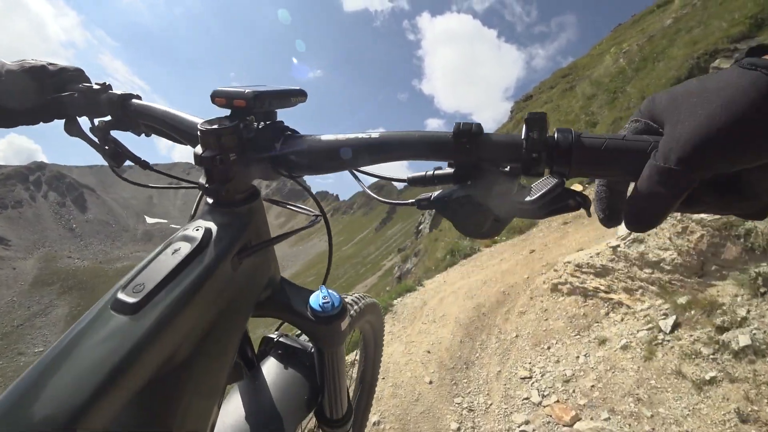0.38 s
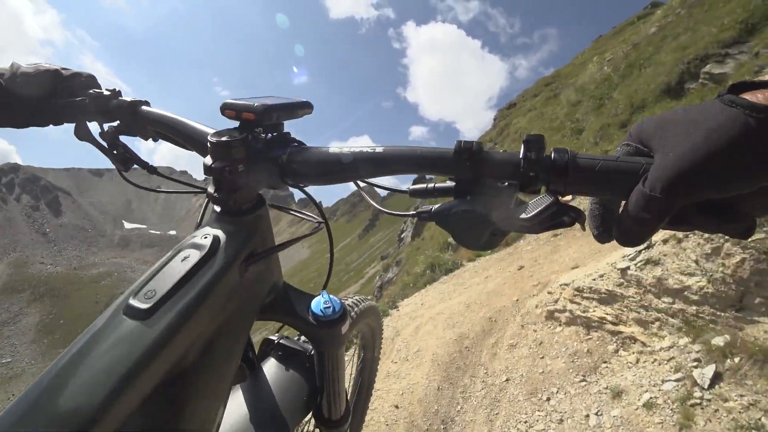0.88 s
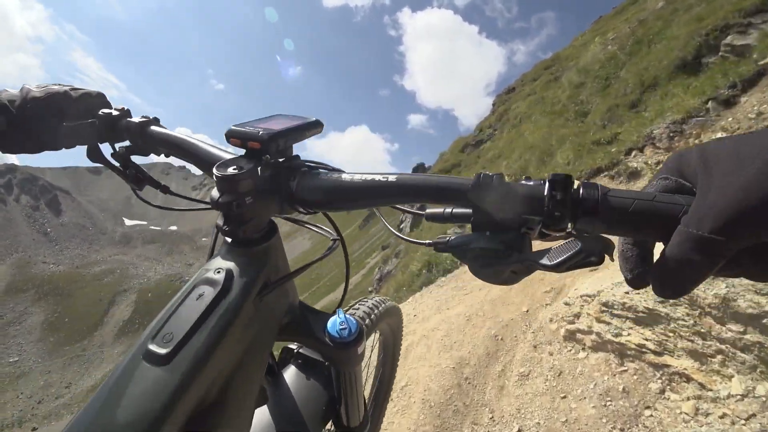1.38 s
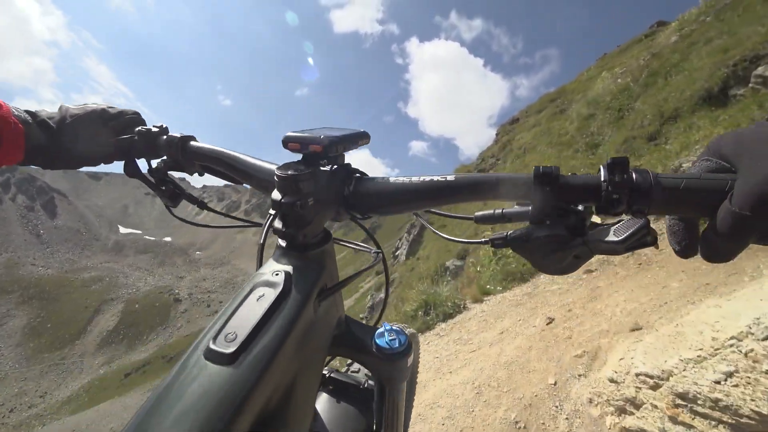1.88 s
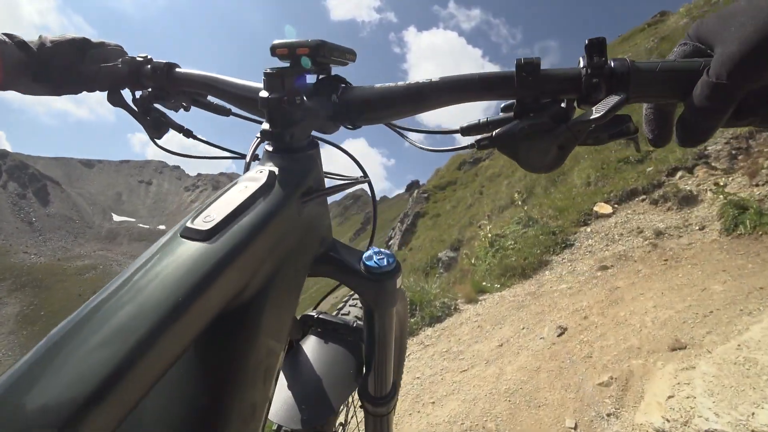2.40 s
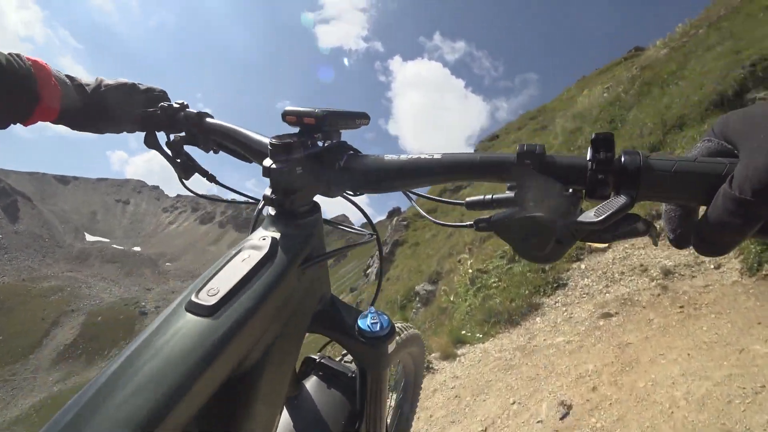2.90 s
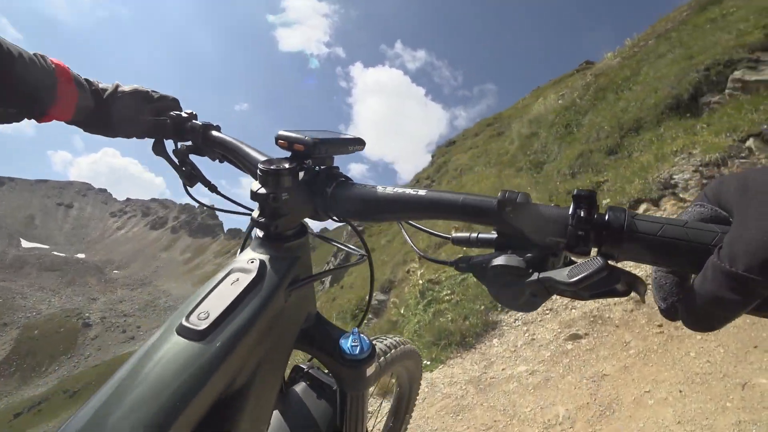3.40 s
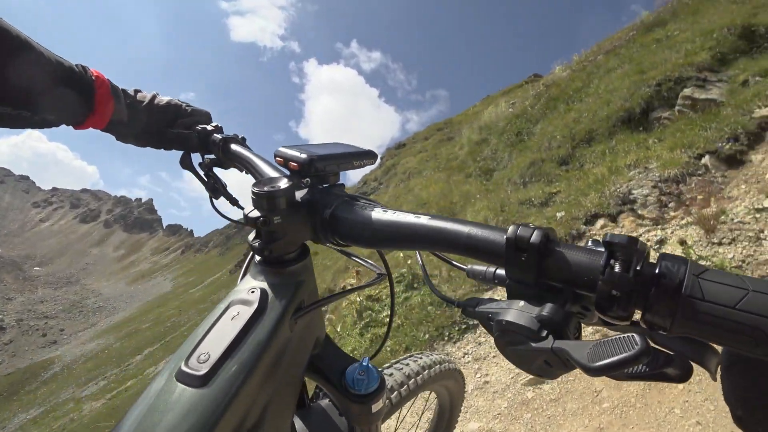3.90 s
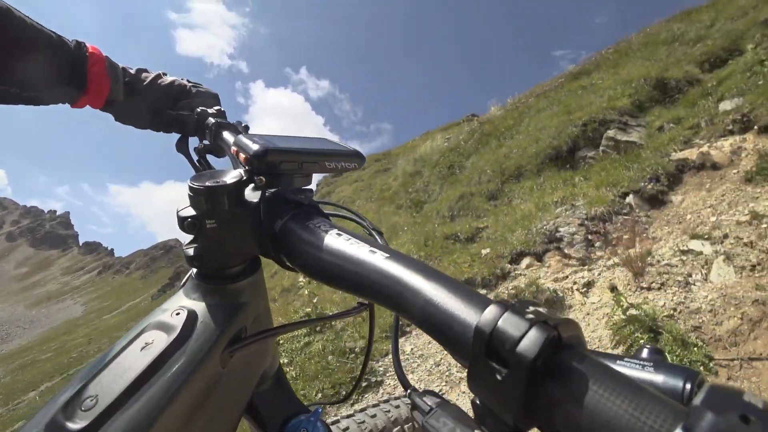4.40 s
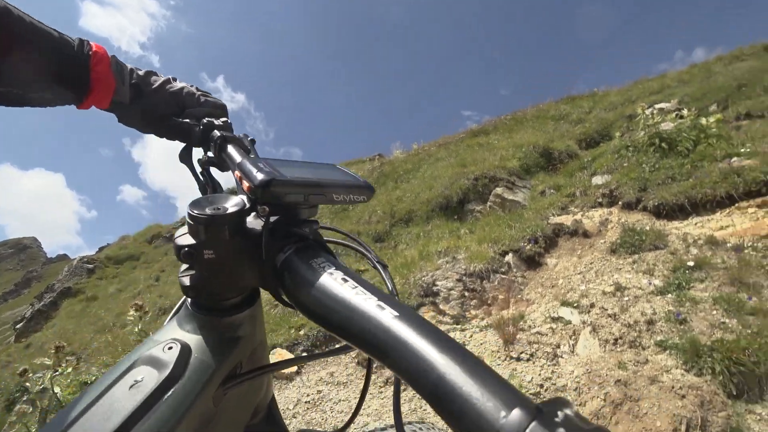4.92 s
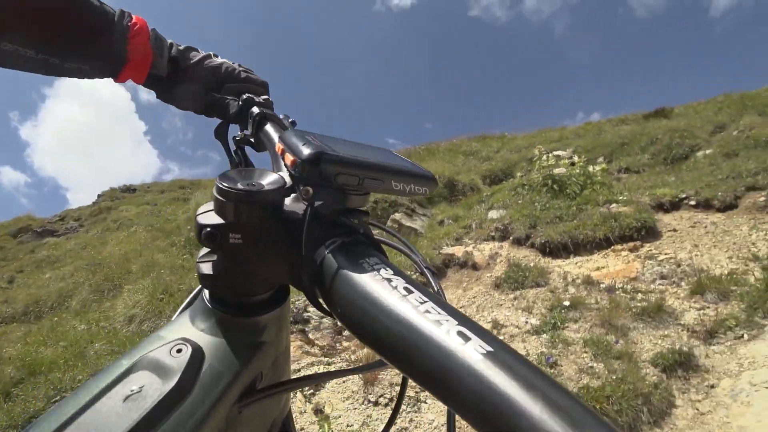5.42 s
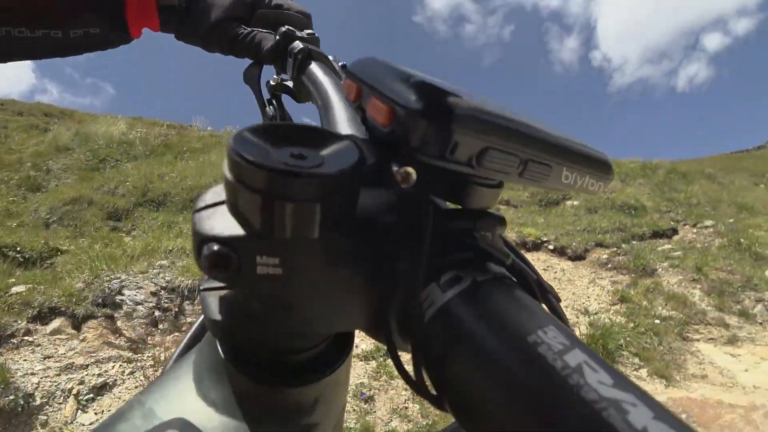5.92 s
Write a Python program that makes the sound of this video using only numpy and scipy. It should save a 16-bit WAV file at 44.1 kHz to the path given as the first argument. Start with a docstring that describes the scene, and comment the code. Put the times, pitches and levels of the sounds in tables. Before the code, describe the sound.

Close, frame-borne sound of tyres rolling on gravel in the open. Soft, dull bumps and short scrapes of slipping stones come first, then a cluster of firmer thuds around the middle. Later a heavy bump, a sharp pebble clack and a loud knock with a faint tubular ring stand out. Deep wind buffets the microphone in gusts above a thin steady hiss.

```python
"""Bicycle on a stony climb

Place: a stony trail, ridden uphill; a small two-port camera is clamped to the bicycle, on its frame's mount.
Tyre thuds, pebble ticks, a ringing tube and rolling gravel are blows played on the mount's decaying resonances.
The mount twists, so its resonances reach the right port late or inverted.
Wind on the ports and microphone hiss are coloured noise."""
import sys
import numpy as np
from scipy import signal
from scipy.fft import rfft, irfft, next_fast_len
from scipy.io import wavfile
from scipy.ndimage import uniform_filter1d

SR = 44100
rng = np.random.default_rng(int(sys.argv[2]) if len(sys.argv) > 2 else 0)


def digitize_waveform(pressure):
    """Quantize a signal to 16-bit integers and store it at the path in sys.argv[1].

    Rows of a 2-D input are taken as channels; values are limited to [-1, 1].
    """
    field = np.atleast_2d(pressure).T
    bounded = np.clip(field, -1, 1)
    quanta = np.round(bounded * 32767).astype(np.int16)
    wavfile.write(sys.argv[1], SR, quanta)


def how_loud(loudness_db):
    """Turn decibels into a plain amplitude multiplier (0 dB gives 1, 20 dB gives 10)."""
    steps = np.asarray(loudness_db, float) / 20
    return 10 ** steps


N = 266805  # length in samples

# resonances of frame and mount, by register; levels are relative within a register:
# pitch_hz, t60_s, left_level_db, right_level_db, right_lag_rad
MOUNT_MODES = { "deep": [(82.7, 0.084, -3, -5, 0.37), (130.1, 0.089, -2, -2, 1.37)],
               "thud": [(121.6, 0.036, -16, -28, 0.32), (157, 0.024, 0.5, -5.5, 1.62),
               (200, .020, 0.5, -6.5, 2.63)], "knock": [(269, 0.021, 6, 4, 2.99),
               (355, 0.031, -7.5, -3, 3.66), (464.4, 0.022, -8.5, -4, 4.26), (560, 0.028, -14, -15, 4.3)],
               "rattle": [(657, 0.016, -15, -14, 4.3), (785, 0.034, -10, -11, 3.28),
               (1035, 0.025, -2.5, -2, 2.37), (1139, 0.013, -4, 1, 2.45), (1262, .016, -2, -3.5, 2.43),
               (1414, .012, -11.5, -6, 2.78)], "grit": [(1620, 0.0081, -0.5, 0.5, 2.65),
               (2000, 0.0056, -5.5, -7, 2.76), (2320, 0.0077, -2.5, -1.5, 2.87),
               (2662, 0.007, -4.5, -1, 2.35), (3170, 0.0053, -0.5, -1.5, 2.57),
               (3717, 0.0098, -11.5, -9, 1.71)], "fizz": [(4240, 0.0049, 6, -6, 3),
               (4875, 0.0086, -0.5, -3, 4.45), (5760, 0.006, -5, -2, 7.65), (6310, 0.005, -1, -1.5, 7.2)],
               "tube": [(263.7, 0.5, -0.5, 0, 1.8), (274.6, .25, -7, -13, 2.5)], }
# time constant with which each register builds up; rubber loads slowly, stone at once: rise_s
REGISTER_RISE_S = {"deep": .006, "thud": .012, "knock": .0015, "rattle": .0005, "grit": .0002, "fizz":
                   .0002, "tube": .008}
# a tyre hits a stone, peaks before scatter: start_s, thud_level_db, deep_level_db, knock_level_db, left_minus_right_db
STONE_HITS = [(0.208, -21.5, -44, -41, -3.5), (0.317, -31, -69, -69, -2.5), (0.583, -42.5, -42.5, -73, 2.5),
              (0.747, -26, -59, -60, 0), (0.812, -52, -39.5, -65, 0), (0.971, -41, -65, -70, -2),
              (1.046, -44, -61, -45, 5.5), (1.245, -36.5, -44.5, -50, 5), (1.357, -29.5, -60, -57, 2.5),
              (1.492, -47, -48.5, -77, 6), (1.596, -41.5, -53, -64, 1), (1.78, -44.5, -62, -78, 3),
              (2.069, -44.5, -41, -71, -1), (2.186, -47, -45.5, -72, -3), (2.46, -26.5, -39, -75, -3),
              (2.552, -22.5, -39, -40, -3), (2.71, -48, -50, -49, 6), (2.793, -41.5, -49, -67, -8),
              (2.92, -21, -37, -34.5, -3), (2.974, -38, -63, -63, -1), (3.048, -28.5, -44, -74, -3),
              (3.186, -48.5, -62, -58, 6), (3.444, -31, -41, -74, 4), (3.57, -36, -46, -72, -5.5),
              (3.738, -41.5, -72, -63, -4), (3.811, -44, -45.5, -89, 14.5), (4.132, -38, -47.5, -78, -1),
              (4.276, -33, -58, -45.5, -0.5), (4.401, -24, -42.5, -47, 1.5), (4.49, -45, -49, -58, 5.5),
              (4.723, -44, -47, -61, -1), (4.782, -39, -55, -71, -1), (4.871, -35, -43, -52, -1.5),
              (4.969, -20.5, -24, -40.5, -4), (4.999, -35.5, -54, -62, 2.5), (5.125, -37.5, -74, -43, -3),
              (5.209, -56, -41, -60, 3), (5.376, -52, -44, -66, 2), (5.458, -47, -50, -49, -2),
              (5.554, -35, -48, -64, -1.5), (5.726, -15.5, -34, -52, 4.5), (5.88, -48, -45, -72, -2),
              (5.966, -38, -46.5, -70, -2.5)]
# pebbles clatter on the frame, peaks of the first touch before scatter:
# start_s, rattle_level_db, grit_level_db, fizz_level_db, knock_level_db
PEBBLE_HITS = [(0.274, -46, -70, -73, -51.5), (0.318, -53, -58, -60, -47.5), (0.366, -49.5, -58, -67, -53),
               (0.749, -51, -67, -70, -41.5), (0.861, -49.5, -60, -72, -65),
               (1.358, -52.5, -68, -68, -40.5), (1.552, -50, -54, -71, -76), (1.585, -51, -71, -61, -61),
               (2.179, -49.5, -50, -64, -71), (2.459, -56, -72, -73, -50), (2.75, -46, -52, -54.5, -70),
               (2.921, -44, -48, -73, -39), (3.012, -51.5, -47.5, -62, -70), (3.05, -51, -60, -66, -81),
               (3.085, -47, -57, -71, -57), (3.118, -46.5, -58, -70, -51.5), (3.194, -50, -56, -70, -54),
               (3.598, -51, -45.5, -49.5, -78), (3.918, -52, -53.5, -62, -63),
               (4.071, -49.5, -67, -76, -66), (4.175, -53, -65, -69, -70), (4.253, -47, -61, -68, -54),
               (4.403, -51, -63, -73, -37.5), (4.453, -51, -70, -74, -56), (4.505, -41, -47.5, -55.5, -69),
               (4.968, -38.5, -52.5, -68, -52), (5.128, -23, -37.5, -56, -61),
               (5.175, -47.5, -66.5, -65, -65), (5.23, -49, -65, -74, -50), (5.401, -46, -57, -71, -62),
               (5.559, -59, -66, -65, -52), (5.727, -26.5, -53, -71, -19.5), (5.775, -57, -52, -65, -54)]
# level lost at each further touch of a pebble, by register: loss_db
TOUCH_LOSS_DB = {"rattle": 16, "grit": 5, "fizz": 2.5}
# a long tube rings on after some blows, peaks before scatter: start_s, level_db
TUBE_RINGS = [(2.462, -56.5), (2.788, -57), (4.871, -61), (4.969, -54), (5.729, -43)]
# rumble of rolling over loose ground, before the shares below: time_s, level_db
ROLL_LEVEL = [(0.0, -63), (0.35, -51), (0.57, -67), (0.72, -63), (0.96, -52), (1.23, -60.5), (1.48, -50.5),
              (1.79, -62), (2.0, -63), (2.16, -51.5), (2.34, -62.5), (2.71, -50), (3.52, -58),
              (3.66, -52.5), (4.92, -55), (5.29, -58), (5.64, -53.5), (6.05, -50)]
# bumps of loose ground: rate_per_s, size_scatter_db, {register: share_db}
GROUND_BUMPS = [(196.9, 3, {"deep": 0, "thud": -4, "knock": -6}),
                (1298, 3, {"rattle": -6.5, "grit": -3.04}), (5000, 3.5, {"fizz": -3})]
# steady gravel under the tyres, before wander and the shares above: level_db
GRAVEL_BED_DB = {"crunch": -63.5, "fizz": -78}
# patches of gravel slip under a tyre, peaks before the shares above: peak_s, fall_s, crunch_level_db, fizz_level_db
GRAVEL_SLIPS = [(0.0, 0.014, -67.5, -79), (.33, .2, -63.5, -75), (.45, 0.075, -57, -76),
                (.6, 0.025, -62, -75.5), (.76, .03, -58, -75), (.82, .03, -60, -72),
                (0.959, .03, -52, -70.5), (1.039, 0.022, -51.5, -67), (1.37, 0.028, -65, -79),
                (1.53, 0.15, -56, -75.5), (2.17, .06, -56.5, -70.5), (2.54, 0.085, -58, -71),
                (2.76, 0.098, -60, -71), (2.93, 0.012, -54, -84), (3.02, 0.015, -71, -68),
                (3.1, 0.046, -53.5, -74), (3.2, 0.071, -56.5, -70.5), (3.489, 0.03, -54.5, -84),
                (3.61, 0.09, -62.5, -72.5), (4.04, 0.036, -70, -65), (4.08, 0.08, -58, -72),
                (4.268, 0.043, -46, -68), (4.5, 0.036, -49.5, -84), (4.72, 0.019, -54.5, -80.5),
                (4.799, 0.013, -58, -61.5), (4.889, 0.05, -57.5, -76), (5.0, .06, -66, -74),
                (5.23, .04, -54, -79), (5.39, 0.074, -58.5, -70), (5.48, .04, -51.5, -75),
                (5.582, 0.03, -49, -66.5), (5.78, 0.054, -53, -71), (5.951, 0.027, -46, -76)]
# mean strength of the wind on the ports: time_s, level_db
WIND_LEVEL = [(0.0, -37), (0.37, -53.5), (0.47, -40), (0.71, -49.5), (1.08, -52), (1.11, -36), (1.43, -52),
              (1.7, -36), (1.77, -46.5), (2.16, -49.5), (2.37, -36), (2.53, -46), (3.15, -38.5),
              (3.2, -37.5), (3.39, -51.5), (3.84, -44), (3.89, -37), (4.04, -46), (4.52, -42),
              (4.57, -52.5), (4.65, -35.5), (5.26, -47), (5.66, -33.5), (6.05, -50)]
# relative spectrum of the wind: pitch_hz, density_db_per_hz
WIND_SPECTRUM = [(8, 3.5), (18, 0), (30, 0.5), (50, -14.5), (80, -11), (200, -38.5), (500, -81)]
# relative spectrum of the microphone hiss: pitch_hz, density_db_per_hz
HISS_SPECTRUM = [(100, 8), (500, 11.5), (2000, 3.5), (5000, -2.5), (7000, -6), (9000, -8.5), (10500, -4.5),
                 (15500, -7)]

HIT_SCATTER_DB = 2  # how unevenly one hard blow reaches the modes
TYRE_LAG_S = 0.0017  # the rubber gives way before the frame takes the load
LARGEST_QUANTILE = 0.997  # the rarest, largest bumps are capped at this quantile
SLIP_RISE_SHARE = 0.73  # rise time of a slip as a share of its fall time
BED_WANDER_PER_S, BED_WANDER_DB = 30, 1.5
BUFFETS_PER_S, BUFFET_DB = 16, 3  # how fast and how far the wind flutters about its mean
HISS_DB = -66.5


def thuds():
    """A stone under the tyre shakes the lower registers."""
    start_s, thud_db, deep_db, knock_db, pan_db = np.transpose(STONE_HITS)
    late_s = start_s + TYRE_LAG_S
    knock = strike("knock", start_s, knock_db, pan_db, HIT_SCATTER_DB)
    thud = strike("thud", late_s, thud_db, pan_db, 1.0)
    deep = strike("deep", late_s, deep_db, pan_db)
    return knock + thud + deep


def ticks():
    """Hard contacts reach the upper registers; each pebble touches again, weaker, within 8 ms."""
    start_s, rattle_db, grit_db, fizz_db, knock_db = np.transpose(PEBBLE_HITS)
    levels = {"rattle": rattle_db, "grit": grit_db, "fizz": fizz_db}
    out = strike("knock", start_s, knock_db, scatter_db=HIT_SCATTER_DB)
    for touch, gap in enumerate(rng.random((len(start_s), 4)).T):
        touch_s = start_s + 0.0017 * touch * (0.5 + gap)
        for register, level_db in levels.items():
            touch_db = level_db - TOUCH_LOSS_DB[register] * touch
            out += strike(register, touch_s, touch_db, scatter_db=HIT_SCATTER_DB)
    return out


def tube_rings():
    """A long tube of the frame rings on after some blows."""
    start_s, level_db = np.transpose(TUBE_RINGS)
    return strike("tube", start_s, level_db, scatter_db=HIT_SCATTER_DB)


def rolling():
    """Dense bumps of uneven size play the same resonances, each mode pushed either way."""
    (rumble_db,) = columns(ROLL_LEVEL)
    grit_db, crunch_db, fizz_db = gravel_levels()
    # the middle register feels both the big stones and the gravel
    knock_db = 0.44 * rumble_db + 0.67 * crunch_db
    levels = {"deep": rumble_db, "thud": rumble_db, "knock": knock_db,
              "rattle": crunch_db, "grit": grit_db, "fizz": fizz_db}
    out = np.zeros((2, N))
    length = next_fast_len(N, True)
    for rate, scatter_db, shares in GROUND_BUMPS:
        place, luck = rng.random((2, int(rate * N / SR)))
        # sizes spread exponentially in dB
        size = how_loud(-scatter_db * np.log(1 - np.minimum(luck, LARGEST_QUANTILE)))
        for register, share_db in shares.items():
            ring = response(register)
            force = np.zeros((ring.shape[1], length))
            push = rng.choice([-1, 1], (len(force), len(size)))
            force[:, (place * N).astype(int)] = size * push
            # convolve each mode's force with its ring, then add the modes
            spectrum = (rfft(force) * rfft(ring, length)).sum(axis=1)
            sound = irfft(spectrum, length)[:, :N]
            out += unit(sound) * how_loud(levels[register] + share_db)
    return out


def gravel_levels():
    """Levels in dB of grit, crunch and fizz: a wandering bed, swelling at every slip."""
    peak_s, fall_s, crunch_db, fizz_db = np.transpose(GRAVEL_SLIPS)[:, :, None]
    # time from each peak in fall times, every 64 samples
    after = (np.arange(0, N, 64) / SR - peak_s) / np.maximum(fall_s, 0.005)
    swell = np.exp(-2 * np.where(after > 0, after, -after / SLIP_RISE_SHARE))
    wander_db = BED_WANDER_DB * walk(BED_WANDER_PER_S)

    def level(slip_db, bed_db):
        """Adds the powers of slips and bed."""
        slips = np.repeat((how_loud(2 * slip_db) * swell).sum(axis=0), 64)[:N]
        return 10 * np.log10(slips + how_loud(2 * (bed_db + wander_db)))

    crunch = level(crunch_db, GRAVEL_BED_DB["crunch"])
    fizz = level(fizz_db, GRAVEL_BED_DB["fizz"])
    # the register between crunch and fizz follows both
    grit = 0.5 * fizz + 0.5 * crunch - 1.5
    return grit, crunch, fizz


def wind():
    """Slow pressure swings that flutter in strength, nearly alike at both ports, a little stronger on the left."""
    (mean_db,) = columns(WIND_LEVEL)
    flutter_db = BUFFET_DB * walk(BUFFETS_PER_S)
    side_db = np.array([[1.3], [-1.3]])
    return pair(WIND_SPECTRUM, alike=0.9) * how_loud(mean_db + flutter_db + side_db)


def hiss():
    """Steady coloured noise of the microphones, partly shared by the channels."""
    return how_loud(HISS_DB) * pair(HISS_SPECTRUM, alike=0.37)


def strike(register, start_s, peak_db, pan_db=0, scatter_db=5.0):
    """Blows at given times ring a register; each reaches the modes a little differently."""
    ring = response(register)
    scatter = scatter_db * rng.standard_normal((len(start_s), ring.shape[1]))
    gains = how_loud(peak_db[:, None] + scatter)
    sides = how_loud(np.outer(pan_db + 0 * start_s, [0.5, -0.5]))
    out = np.zeros((2, N + SR))
    for start, gain, side in zip((start_s * SR).astype(int), gains, sides):
        out[:, start:start + ring.shape[2]] += side[:, None] * (gain @ ring)
    return out[:, :N]


def response(register):
    """Ring of each mode of a register at both ports: a sine that builds up, then dies away."""
    pitch_hz, t60_s, left_db, right_db, lag_rad = np.array(MOUNT_MODES[register]).T[:, :, None]
    t = np.arange(int(1.2 * t60_s.max() * SR)) / SR
    rise = (1 - np.exp(-t / REGISTER_RISE_S[register])) ** 2
    decay = np.exp(-np.log(1000) * t / t60_s)
    phase = 2 * np.pi * pitch_hz * t
    left = how_loud(left_db) * np.sin(phase)
    right = how_loud(right_db) * np.sin(phase - lag_rad)
    ring = np.array([left, right]) * rise * decay
    if register not in ("deep", "thud"):
        # neighbouring bending modes swing in opposite directions at the mount
        ring *= (-1) ** np.arange(len(pitch_hz))[:, None]
    # the summed modes, averaged over the ports, peak at 1
    return ring / np.abs(ring.sum(axis=1).mean(axis=0)).max()


def pair(colour, alike):
    """Two coloured noises, mixed from mid and side so that their correlation is near 'alike'."""
    hz = np.arange(1, N // 2 + 2) * SR / N
    colour_hz, colour_db = np.transpose(colour)
    gain = how_loud(np.interp(np.log(hz), np.log(colour_hz), colour_db))
    mid, side = irfft(rfft(rng.standard_normal((2, N))) * gain, N)
    return unit(np.sqrt(1 + alike) * mid + np.sqrt(1 - alike) * side * np.array([[1], [-1]]))


def walk(rate):
    """Random levels held 1 / rate s and smoothed twice over that time; spread near 1."""
    hold = int(SR / rate)
    steps = np.repeat(rng.standard_normal(400), hold)[:N]
    return 1.3 * uniform_filter1d(uniform_filter1d(steps, hold), hold)


def columns(table):
    """Each column of a curve over time, interpolated sample by sample."""
    time_s, *values = np.transpose(table)
    return [np.interp(np.arange(N) / SR, time_s, v) for v in values]


def unit(x):
    """Scales so that the mean of both channels has rms 1."""
    return x / np.sqrt(np.mean(x.mean(axis=0) ** 2))


def scene():
    """Everything that shakes the camera, and the wind on its ports."""
    return thuds() + ticks() + tube_rings() + rolling() + wind()


def band_limit(x):
    """A steep low-pass at the top of the band."""
    return signal.sosfilt(signal.butter(12, 16630, fs=SR, output="sos"), x)


def record(dry):
    """Adds the microphone hiss to what reaches the ports."""
    mix = dry + hiss()
    return band_limit(mix)


dry = scene()
out = record(dry)
digitize_waveform(out)
```